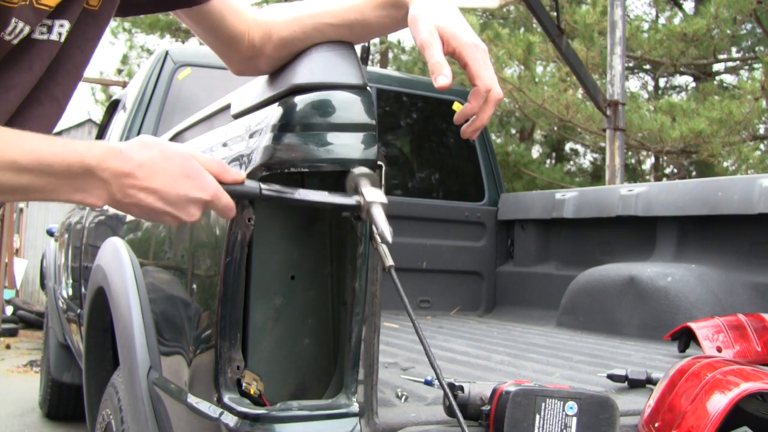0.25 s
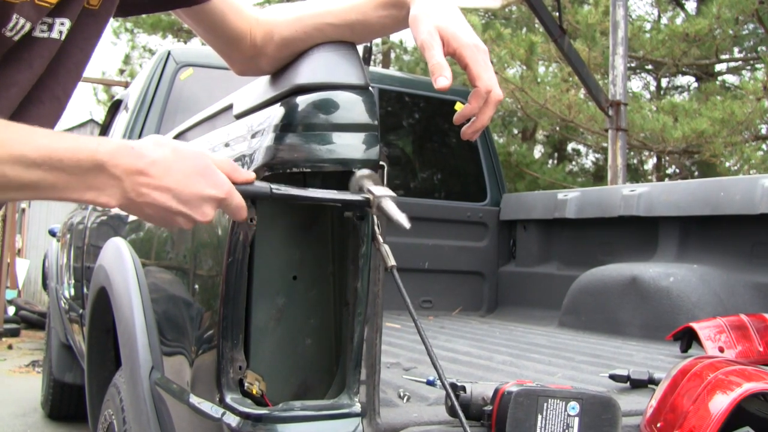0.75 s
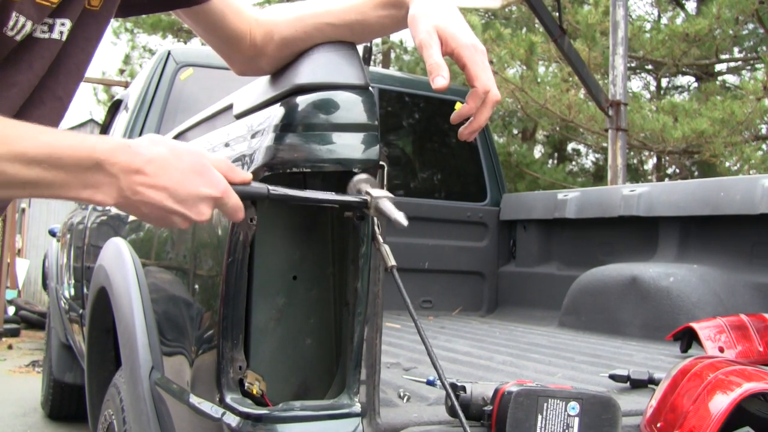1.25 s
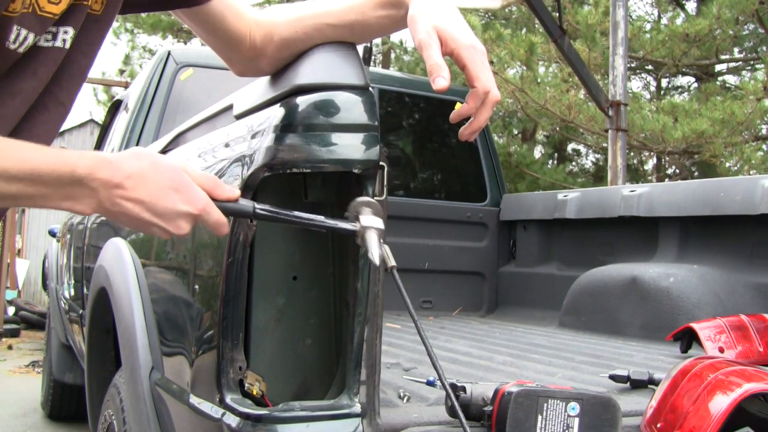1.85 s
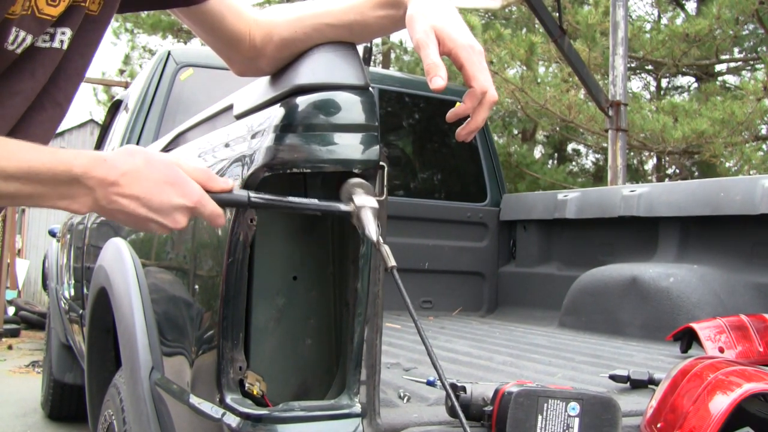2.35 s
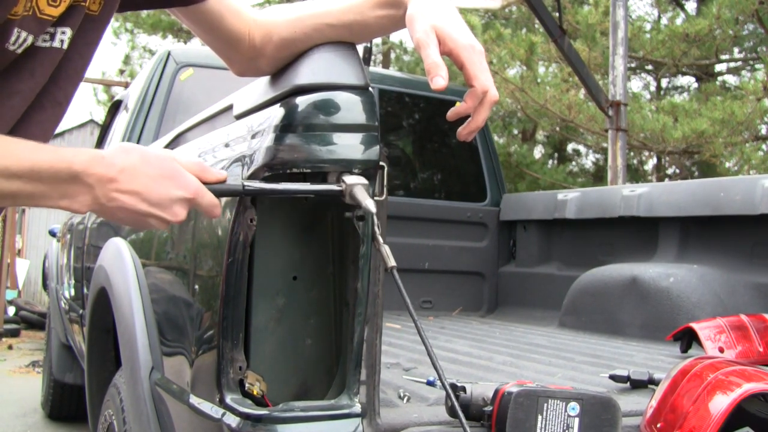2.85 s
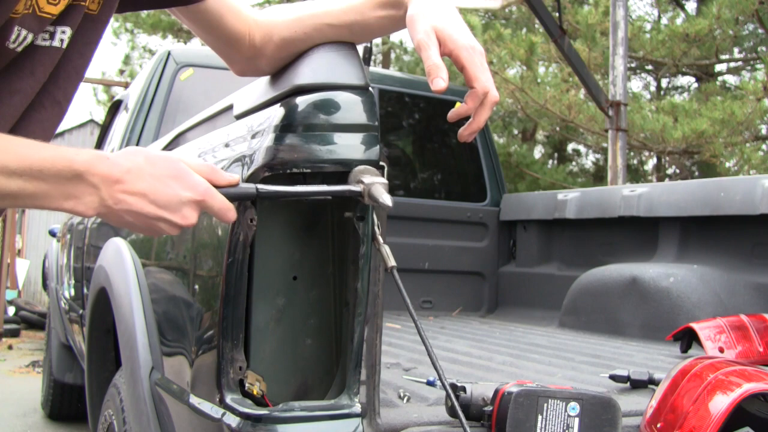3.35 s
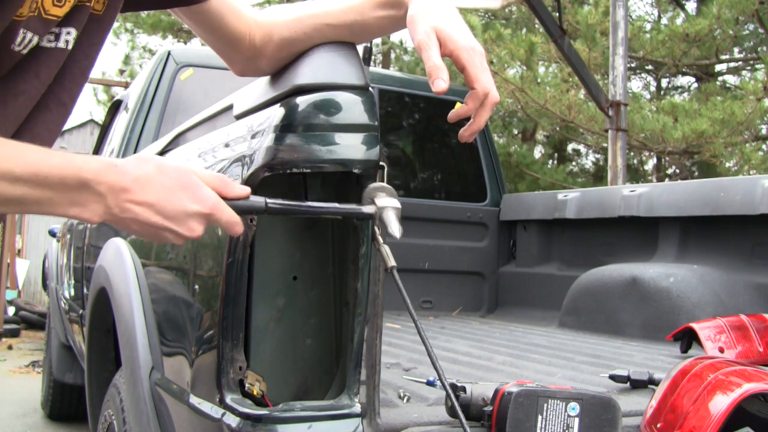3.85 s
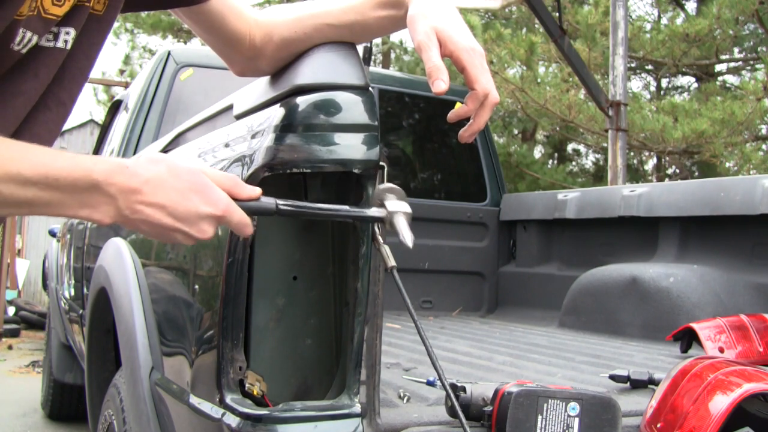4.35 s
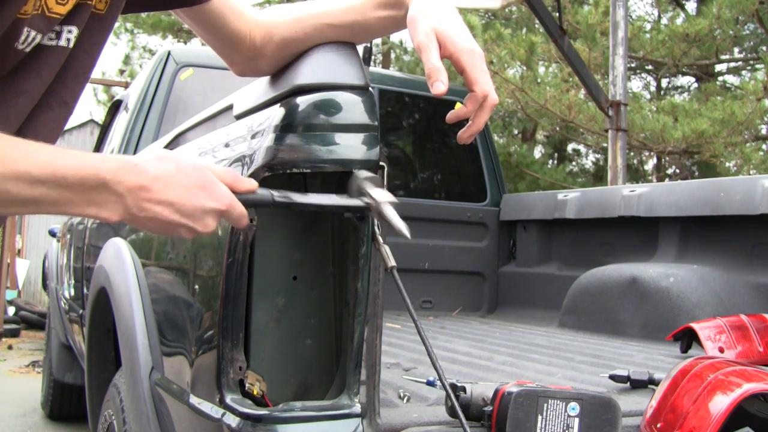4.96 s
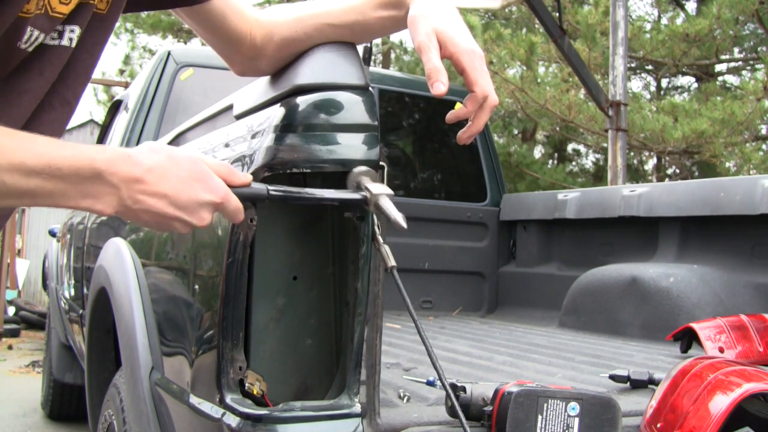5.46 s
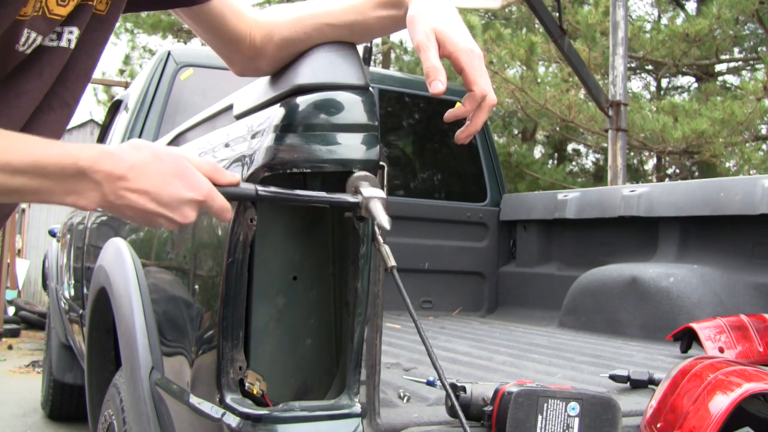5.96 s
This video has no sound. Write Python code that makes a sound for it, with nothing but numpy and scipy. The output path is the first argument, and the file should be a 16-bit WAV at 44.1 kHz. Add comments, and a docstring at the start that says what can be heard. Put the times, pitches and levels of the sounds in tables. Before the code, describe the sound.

Close, loud blows of a slide hammer on a pickup bed, about four a second. Each is a bright steel crack, a short clang of tool and sheet metal, then a slightly late hollow boom. Early blows match; a few around two to three seconds land unevenly, clankier or boomier, before the even rhythm returns. Soft outdoor air and faint bird chirps sit behind. Close stereo microphone, peaks slightly clipped.

```python
"""A slide hammer pulls a dent from a pickup bed outdoors, about four blows a second, under air noise and faint birds.
The tail of a blow opens; each blow is a crack of steel, a clang of tool and sheet metal, then a late hollow boom.
Blows ring alike until about 1.8 s; up to 3 s several land askew or make the panel give, as does one near 5 s.
Cracks and clangs are shaped noise plus decaying sines, booms are sines, birds are gliding sines; loud peaks clip."""
import sys
import numpy as np
from scipy import signal
from scipy.fft import rfft, irfft, next_fast_len
from scipy.io import wavfile
from scipy.ndimage import uniform_filter1d

SR = 44100
rng = np.random.default_rng(int(sys.argv[2]) if len(sys.argv) > 2 else 0)


def store_pcm(level_fs):
    """Save levels as 16-bit WAV."""
    pcm = np.round(np.clip(level_fs, -1, 1) * 32767).astype(np.int16)
    wavfile.write(sys.argv[1], SR, np.atleast_2d(pcm).T)


N = 274302
RING = 32768  # samples in one ring
T = np.arange(RING) / SR
HZ = np.fft.rfftfreq(RING, 1 / SR)
BANDS = np.geomspace(30, 16000, 28)  # band centres, Hz


def amp(db):
    """Decibels to gain."""
    return 10 ** (np.asarray(db) / 20)


def evened(x):
    """Scales to an rms of 1."""
    return x / np.sqrt(np.mean(x ** 2) + 1e-20)


def read(table, hz, axis=1):
    """One column of a table, joined by straight lines over log frequency."""
    table = np.array(table, float)
    return np.interp(np.log(hz + 1), np.log(table[:, 0]), table[:, axis])


def add(mix, s, sound):
    """Mixes a sound in at time s; what falls outside the mix is dropped."""
    start = round(s * SR)
    sound = sound[max(-start, 0):]
    part = mix[:, max(start, 0):][:, :len(sound)]
    part += sound[:part.shape[1]]


def scatter(size=RING):
    """The spectrum of white noise of rms 1: flat, with random phases."""
    return np.sqrt(size) * np.exp(2j * np.pi * rng.random(size // 2 + 1))


def swell_and_die(t60_s, build_s):
    """A ring that builds up as the vibration spreads, then dies away."""
    build = (1 - np.exp(-T / max(build_s, 1e-5))) ** 2
    return build * amp(-60 * T / max(t60_s, 1e-3))


def noise_tail(t60_s, build_s):
    """A diffuse echo of unit energy: noise that swells and dies."""
    return evened(rng.standard_normal(RING) * swell_and_die(t60_s, build_s)) / np.sqrt(RING)


def air():
    """Steady outdoor background: shaped noise with a slight slow swell."""
    # outdoor spectrum: (frequency [Hz], relative level [dB])
    spectrum = [(25, -24.5), (60, -15), (120, 7), (200, -2), (500, -3), (1000, -1.5), (1800, -14.5),
                (3200, -23), (4500, -28), (7000, -34), (15000, -42)]
    level_db, swell_spread_db, swell_points = -48.5, .7, 30
    gain = amp(read(spectrum, np.fft.rfftfreq(N, 1 / SR)))
    noise = irfft(rfft(rng.standard_normal(N)) * gain, N)
    points_db = swell_spread_db * rng.standard_normal(swell_points)
    swell_db = np.interp(np.arange(N), np.linspace(0, N, swell_points), points_db)
    return amp(level_db + swell_db) * evened(noise)


def far_chirps(count=14):
    """Farther birds: short glides, mostly upwards, at random times and pitches, in the near birds' columns."""
    low_hz, high_hz, mean_s, rise, level_db = 2400, 4520, 0.047, 0.045, -66
    when, pitch, length, glide = rng.random((count, 4)).T
    start_hz = low_hz + (high_hz - low_hz) * pitch
    end_hz = start_hz * (1 + rise * (2 * glide - .5))
    return list(zip(when * N / SR, mean_s * (.5 + length), start_hz, end_hz, np.full(count, level_db)))


def birds(echo_t60_s=0.29, wet=0.51):
    """Thin far whistles: gliding, wavering sines, smeared by the trees."""
    # nearer birds: (time [s], length [s], start [Hz], end [Hz], relative level [dB])
    near_chirps = [(.932, 0.068, 3300, 3280, -57.5), (2.145, 0.069, 3380, 3150, -61),
                   (2.233, 0.04, 4470, 4700, -66), (2.26, .066, 2830, 3400, -60.5),
                   (2.31, 0.031, 4430, 4650, -66), (2.522, .05, 4480, 4640, -64),
                   (3.056, 0.054, 3600, 3450, -58), (3.09, 0.11, 3100, 2900, -64),
                   (3.411, 0.22, 3320, 3580, -62), (4.238, .048, 3750, 3970, -65),
                   (4.73, 0.14, 3370, 3300, -62)]
    out = np.zeros((1, N))
    for s, length_s, start_hz, end_hz, db in list(near_chirps) + far_chirps():
        u = np.linspace(0, 1, int(max(length_s, .01) * SR))
        slow_noise = uniform_filter1d(rng.standard_normal(len(u)), size=150)
        waver = 1 + .01 * evened(slow_noise)
        hz = (start_hz + (end_hz - start_hz) * np.sin(u * np.pi / 2)) * waver
        envelope = np.sqrt(abs(np.sin(np.pi * u)))
        add(out, s, amp(db) * envelope * np.sin(2 * np.pi * np.cumsum(hz) / SR))
    trees = noise_tail(echo_t60_s, .005)
    echo = signal.oaconvolve(out[0], trees)[:N]
    return (out[0] + wet * echo) / np.hypot(1, wet)


def band_envelopes(table):
    """Level against time in each band; nothing rings far outside the table's range."""
    db, t60_s, build_s = (read(table, BANDS, axis=k) for k in range(1, 4))
    inside = np.minimum(1, np.minimum(BANDS / table[0][0], table[-1][0] / BANDS)) ** 4
    return np.array([g * swell_and_die(d, b) for g, d, b in zip(amp(db) * inside, t60_s, build_s)])


def modes(table, shift, ring, phases, colour, drift=0.0082):
    """Sums decaying sines; shift (0-1) moves the energy from the first set of levels to the second."""
    detune = 1 + drift * shift * rng.standard_normal(len(table)) / 2
    total = 0
    for (hz, first_db, second_db, t60_s, build_s), phase, d in zip(table, phases, detune):
        gain = colour(hz) * amp(first_db + shift * (second_db - first_db))
        sine = np.sin(2 * np.pi * hz * d * T + phase)
        total = total + gain * swell_and_die(t60_s * ring, build_s) * sine
    return total


def strokes():
    """Square blows crack and boom, askew ones clang; a panel that gives takes the edge off and rings shorter."""
    # blows: (time [s], force [dB], how far the panel gives [0-1], how far askew the weight lands [0-1])
    blows = [(-.157, 2, 0.1, 0.47), (0.0884, -0.5, 0, 0), (0.3326, -1, 0, 0), (0.5785, -1, 0, 0),
             (.8270, 0.4, 0, 0.1), (1.059, -0.6, .05, 0), (1.3176, -0.8, .1, .1),
             (1.5863, -1.95, 0.1, 0.07), (1.83, 2, .8, .8), (2.3571, -1.5, .95, .5),
             (2.6073, -1.5, .05, 0.09), (2.841, 0, .35, 1), (2.9511, -0.5, .5, .65),
             (3.6061, -2.5, 0.08, 0.07), (3.8515, -1.6, 0, 0.02), (4.1045, -1.5, 0, 0.02),
             (4.3401, -0.5, 0.02, 0.03), (4.5830, -0.5, 0.07, 0.06), (4.8223, -0.6, 0.1, 0.12),
             (5.067, 1.2, 0.5, .25), (5.2885, -2, 0, 0), (5.5347, -1.2, .1, 0.1), (5.7750, -0.5, .05, 0.1),
             (6.0126, -1.85, 0.05, 0)]
    # changes: (dB when the panel gives fully, dB when the weight lands fully askew)
    crack_change_db, steel_change_db = (-0.5, -2.5), (-5, -7.5)
    clang_change_db, boom_change_db = (-4.5, 9), (8.5, -11.5)
    give_damping = 0.17  # share of the ring time lost when the panel gives fully
    full_stroke_s, short_stroke_db = .22, -13  # a sooner blow has no run-up and loses its bright edge
    base_crack_db = 2.5
    changes_db = [crack_change_db, steel_change_db, clang_change_db, boom_change_db]
    last_s = -np.inf
    for s, force_db, give, askew in blows:
        give, askew = np.clip([give, askew], 0, 1)
        crack_db, ring_db, middle_db, boom_db = np.dot(changes_db, [give, askew])
        short_db = short_stroke_db * max(0, 1 - (s - last_s) / full_stroke_s)
        last_s = s
        crack_db += base_crack_db + short_db
        ring = 1 - give_damping * give
        yield s, force_db, give, askew, crack_db, ring_db + short_db, middle_db, boom_db, ring


def crack(spectrum):
    """Steel meets steel: a bright noise burst of a few milliseconds."""
    # contact spectrum: (frequency [Hz], relative level [dB])
    contact_levels = [(100, -36.5), (500, 3.5), (1200, -3.5), (2000, -11.5), (3200, -1.5), (4300, -19),
                      (5400, 1.5), (7000, -0.5), (9400, -1), (10200, -10), (12300, -10), (14200, -3.5),
                      (16000, -17.5)]
    decay_s, window_s, gain_db = .0008, .004, 2
    burst = irfft(spectrum) * np.exp(-T / decay_s)
    even = np.exp(1j * np.angle(rfft(burst)))  # every frequency is struck equally hard
    log_gain = np.log(amp(read(contact_levels, HZ)))
    mirrored = np.r_[log_gain, log_gain[-2:0:-1]]
    causal = np.exp(np.conj(signal.hilbert(mirrored)))[:len(HZ)]  # minimum phase: the filter adds no pre-ring
    window = np.exp(-(T / window_s) ** 2)
    return amp(gain_db) * np.sqrt(decay_s * SR / 2) * irfft(even * causal) * window


def hammer(clang_db=-5, steel_db=-4.5, yard_db=-6, chance=0.37, boom_hz=300, clang_hz=1300,
           clang_octaves=0.98, panel_delay_s=0.00499, boom_delay_s=0.02553):
    """The same metal is struck each time, so much of its fine ring repeats, less so as the panel gives."""
    # side panel modes: (frequency [Hz], level holding [dB], level giving [dB], t60 [s], build-up [s])
    panel_modes = [(224.8, -24.5, -20.5, 0.39, 0.0027), (265.4, -33.5, -18.5, 0.21, 0.006),
                   (326.5, -33.5, -20, 0.53, 0.0049), (380.6, -33.5, -25.5, 0.36, 0.012),
                   (403.5, -23, -27.5, 0.43, .007), (431.4, -20, -24, .35, 0.0032),
                   (456, -18.5, -17, 0.27, 0.011), (519, -30.5, -21.5, 0.4, 0.0041),
                   (548, -29, -7.5, .28, .007), (602, -27, -17, 0.38, 0.008),
                   (632, -29.5, -23.5, 0.26, 0.013), (670, -22, -29.5, 0.25, .008),
                   (717.5, -20.5, -24, 0.23, 0.0073), (727, -21, -26, 0.29, 0.015),
                   (778, -25.5, -23, 0.17, 0.0027), (867, -31, -27, .26, 0.0045),
                   (945.7, -25.5, -26.5, .24, 0.0029), (1052, -34, -31.5, .26, .005),
                   (1068, -27.5, -34, 0.24, 0.0073), (1147, -30.5, -34.5, 0.32, 0.0028),
                   (1178, -31, -30.5, 0.16, 0.0045), (1198, -21.5, -30.5, 0.18, 0.0028),
                   (1278, -34.5, -27.5, 0.22, 0.0048), (1341, -30.5, -31, 0.27, .004),
                   (1422, -30.5, -23, .2, .004), (1473, -26, -16, .2, .004),
                   (1556, -24.5, -26.5, .17, .003), (1559, -30, -30, 0.15, .003),
                   (1690, -37, -25.5, 0.11, 0.0027)]
    # hollow bed modes: (frequency [Hz], level holding [dB], level giving [dB], t60 [s], build-up [s])
    bed_modes = [(96.4, -39, -38, .7, .02), (126.6, -34, -29, 0.6, 0.044), (180.4, -20, -21, 0.47, 0.022),
                 (202.8, -16.5, -24, 0.41, 0.016), (224.8, -17.5, -19.5, 0.41, 0.026)]
    # shaft and hook modes: (frequency [Hz], level square [dB], level askew [dB], t60 [s], build-up [s])
    tool_modes = [(768, -46.5, -4.5, 0.087, 0.0032), (1950, -33, -23, 0.17, 0.00077),
                  (2053, -28, -23.5, 0.18, .002), (2121, -30, -21.5, 0.2, .002),
                  (2304, -24.5, -17.5, .12, 0.0018), (2650, -28, -15.5, 0.091, 0.0023),
                  (2927, -23, -32.5, 0.12, 0.001), (3180, -28, -35.5, 0.12, .002),
                  (3272, -26, -33, .13, 0.00067), (3575, -42, -23, .12, .0005), (3805, -44, -20, .1, .0005),
                  (4545, -41, -20, .07, .0003), (4650, -43, -16, .07, .0003), (4770, -43, -20, .07, .0003),
                  (5455, -33, -28, .12, .0003), (6118, -30, -37, .14, .0003), (6370, -30, -36, .14, .0003),
                  (6780, -30, -34, .13, .0003), (7850, -31, -36, .11, .0003), (8144, -31, -36, .12, .0003),
                  (8280, -29, -36, .13, .0003), (9460, -18, -18.5, 0.024, .0001),
                  (11400, -34.5, -16.5, 0.024, 0.000075)]
    # dense small modes of sheet metal and tool: (frequency [Hz], relative level [dB], t60 [s], build-up [s])
    clang_bands = [(29.8, -27.5, 1, 0.004), (78, -13, 0.94, 0.0028), (178.4, 0.5, 0.98, 0.005),
                   (324, -3, 0.78, 0.002), (422, 6.5, 0.37, 0.0048), (640, 3.5, 0.38, 0.0011),
                   (990, -4, 0.32, 0.0029), (1390, 5.5, 0.17, 0.0025), (1780, -4.5, 0.17, 0.0027),
                   (2280, -2.5, 0.15, 0.0023), (3200, -5.5, 0.15, 0.0082), (3830, -9, 0.086, .001),
                   (5950, -15, 0.19, 0.00091)]
    # hardened shaft and its stop: (frequency [Hz], relative level [dB], t60 [s], build-up [s])
    steel_bands = [(2000, -18.5, 0.063, .0002), (4350, -3, 0.03, 0.00067), (5830, -1, 0.07, 0.00032),
                   (6850, 1, 0.14, 0.00024), (7250, 7, 0.048, 0.00069), (9100, -13, 0.081, .0002),
                   (11700, -13, .08, 0.00016), (13880, -3.5, .072, 0.00018), (15630, -6.5, 0.058, .0002)]
    # answer from house and trees: (frequency [Hz], relative level [dB], t60 [s], build-up [s])
    yard_bands = [(100, -17, 0.79, 0.019), (230, 1, 0.92, 0.0063), (700, -23.5, 0.23, 0.041),
                  (1500, -15, 0.38, .02), (2950, -26, 0.46, 0.032), (4170, -29, 0.35, 0.017),
                  (6460, -22, 0.37, .015), (8170, -34, 0.51, 0.017), (9900, -33, 0.31, .015),
                  (16000, -41, 0.41, .015)]
    # overlapping bands that sum to a flat spectrum
    split = np.array([np.interp(np.log(HZ + 1), np.log(BANDS), row) for row in np.eye(len(BANDS))])
    clang, steel, yard = (band_envelopes(table) for table in (clang_bands, steel_bands, yard_bands))
    loss_db = -60 * T / read(clang_bands, BANDS, axis=2)[:, None]
    metal, contact = scatter(), scatter()
    panel_phases, tool_phases = (rng.uniform(0, 2 * np.pi, len(t)) for t in (panel_modes, tool_modes))
    out = np.zeros((1, N))
    for s, force_db, give, askew, crack_db, ring_db, middle_db, boom_db, ring in strokes():
        force = amp(force_db)
        new = np.clip(chance + give, 0, 1)
        same = np.sqrt(1 - new ** 2)

        def colour(hz):
            """This blow's gain in the boom and clang ranges."""
            low_db = boom_db / (1 + (hz / boom_hz) ** 4)
            mid_db = middle_db * np.exp(-(np.log2(hz / clang_hz) / clang_octaves) ** 2 / 2)
            return amp(low_db + mid_db)

        # modes too dense to tell apart, band by band, with the yard's tail under them
        grain = irfft(split * (same * metal + new * scatter()))
        treble = amp(ring_db * (BANDS > 4000))[:, None]
        clang_power = (amp(clang_db + loss_db * (1 / ring - 1)) * clang) ** 2
        steel_power = (amp(steel_db + ring_db) * steel) ** 2
        yard_power = (amp(yard_db) * yard * treble) ** 2
        sound = colour(BANDS) @ (grain * np.sqrt(clang_power + steel_power + yard_power))

        phases = panel_phases + 2 * give * rng.standard_normal(len(panel_modes))
        add(out, s + panel_delay_s, force * modes(panel_modes, give, ring, phases, colour))

        phases = tool_phases + new * rng.standard_normal(len(tool_modes))
        sound += modes(tool_modes, askew, ring, phases, np.ones_like)
        sound += amp(crack_db) * crack(same * contact + new * scatter())
        add(out, s, force * sound)

        # the bending wave needs time to cross the bed; its modes start together and beat
        phases = new * rng.standard_normal(len(bed_modes))
        add(out, s + boom_delay_s, force * modes(bed_modes, give, ring, phases, colour))
    return out[0]


def walls(x, side_db, t60_s, bright_hz):
    """Bed walls reflect sideways, so the ports hear it with opposite sign, most in the treble."""
    high_pass = signal.butter(1, min(bright_hz, SR / 3), "high", fs=SR)
    tail = signal.lfilter(*high_pass, noise_tail(t60_s, 0.0016))
    return amp(side_db) * signal.oaconvolve(x, tail)[:N]


def ports(x):
    """Two close ports hear nearly the same bass; the body round them shades and scatters the treble."""
    # ports: (frequency [Hz], left minus right [dB], mean left lead [rad], phase ripple per port [rad rms])
    port_response = [(30, .3, .35, .05), (70, -.2, .15, .03), (160, -.7, .11, .03), (350, -.1, .14, .03),
                     (600, .3, .16, .03), (1200, .1, .1, .03), (3500, 0, 0, .05), (7000, -.8, -.1, .17),
                     (8700, -3, -.35, .22), (9400, -7.5, .2, .22), (11000, -1, .6, .3),
                     (12500, .5, .7, .42), (13900, 7, .7, .42), (16000, 2, .2, .45)]
    size = next_fast_len(N + RING)
    hz = np.fft.rfftfreq(size, 1 / SR)
    balance_db, lead_rad, loose_rad = (read(port_response, hz, axis=k) for k in range(1, 4))
    # short paths round the body ripple the phase between the ports
    delays_s = np.linspace(.0002, .0012, 6)
    ripple = evened(sum(np.sin(2 * np.pi * (hz * delay + rng.random())) for delay in delays_s))
    lean = amp(balance_db / 2) * np.exp(1j * (lead_rad / 2 + loose_rad * ripple))
    return irfft(rfft(x, size) * np.array([lean, 1 / lean]), size)[:, :N]


def scene(wide_db=-14):
    """The background comes from all round, so a little of it differs between the ports."""
    blows = hammer()
    side = walls(blows, side_db=-20.5, t60_s=.2, bright_hz=6000) + amp(wide_db) * air()
    return ports(blows + birds() + air()) + side * np.array([[1], [-1]])


def record(dry, ceiling=1.0, edge_hz=16000):
    """The cracks overload the input and clip; then a low-pass sets the band limit."""
    clipped = np.clip(dry, -ceiling, ceiling)
    low_pass = signal.firwin(255, edge_hz, window=("kaiser", 8), fs=SR)
    return signal.oaconvolve(clipped, low_pass[None], "same")


dry = scene()
out = record(dry)
store_pcm(out)
```